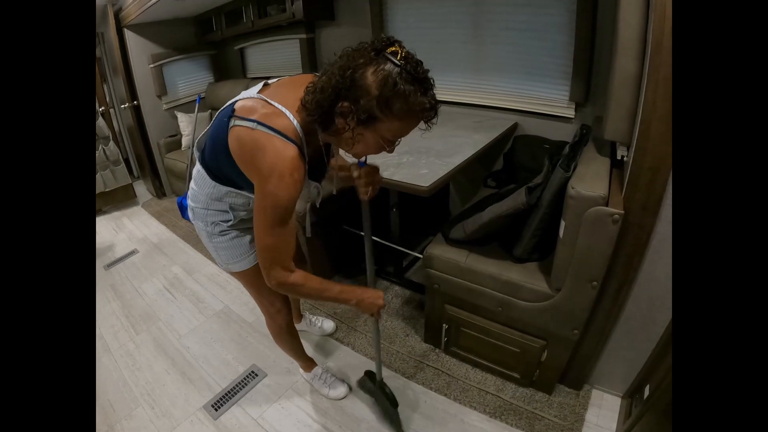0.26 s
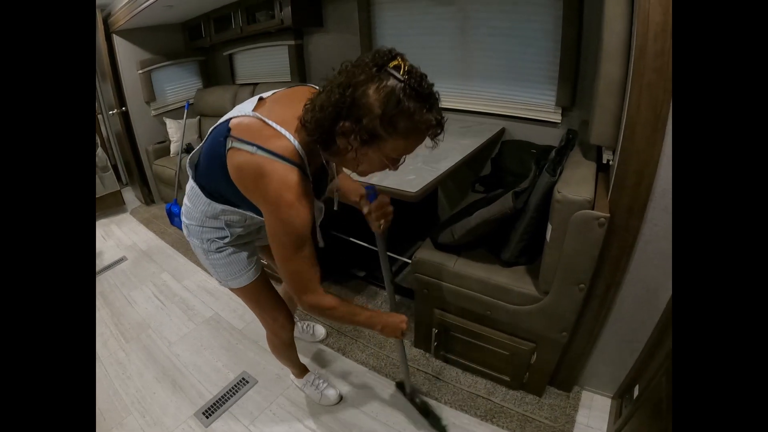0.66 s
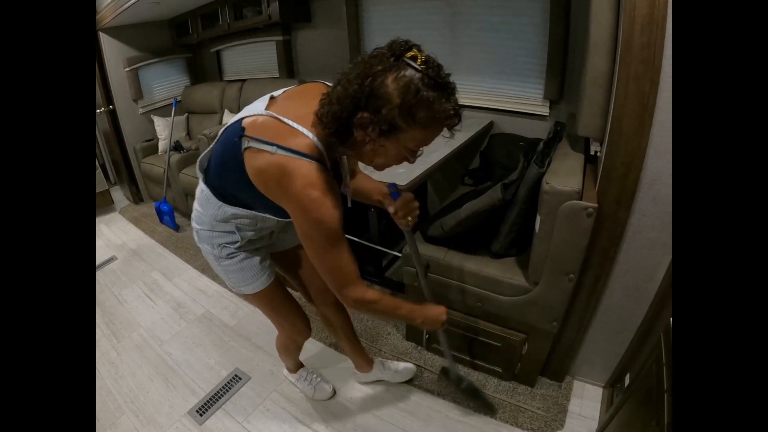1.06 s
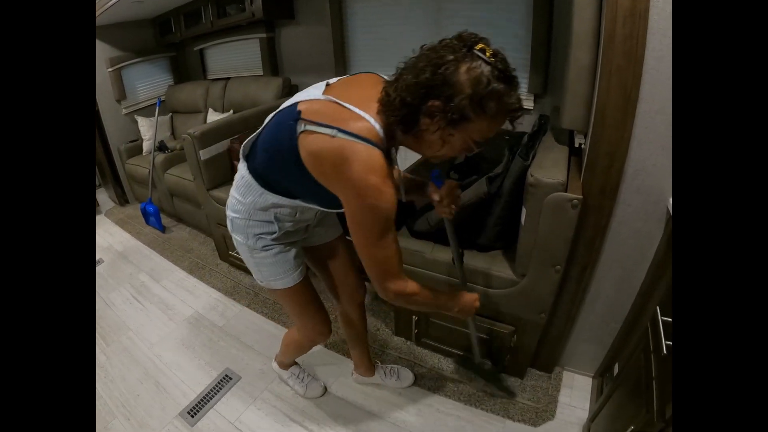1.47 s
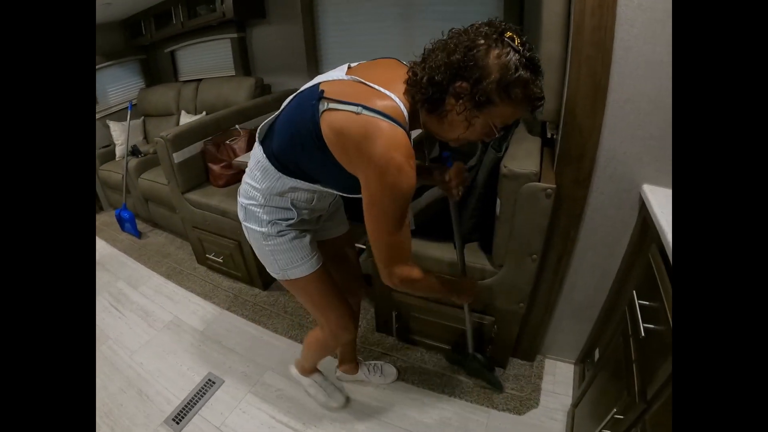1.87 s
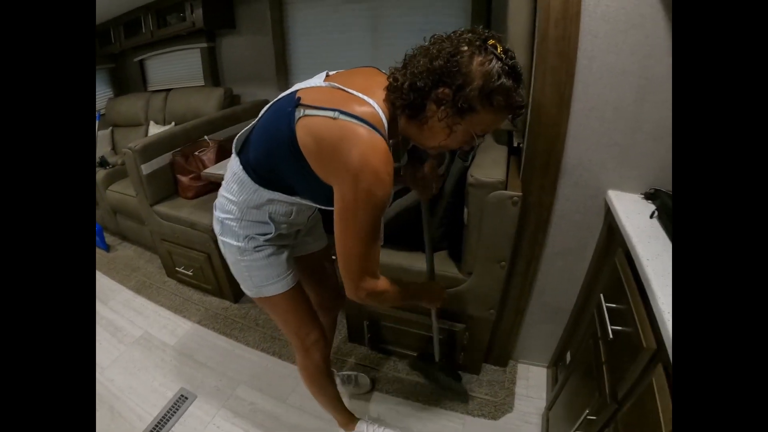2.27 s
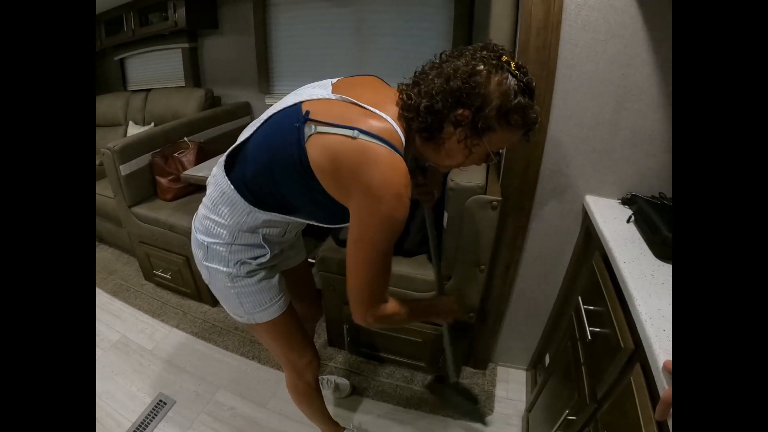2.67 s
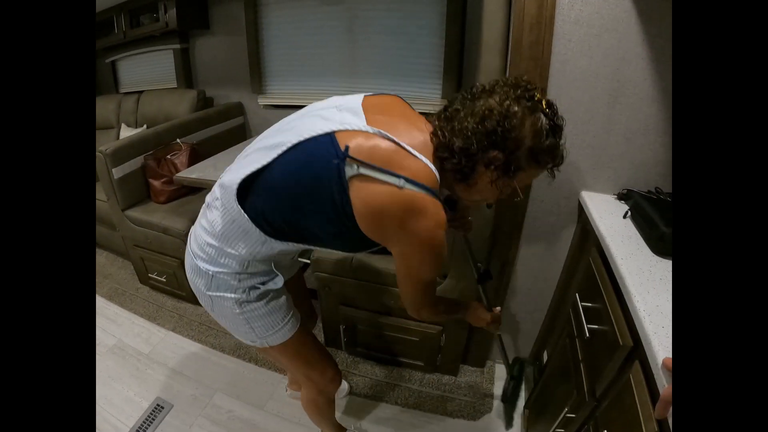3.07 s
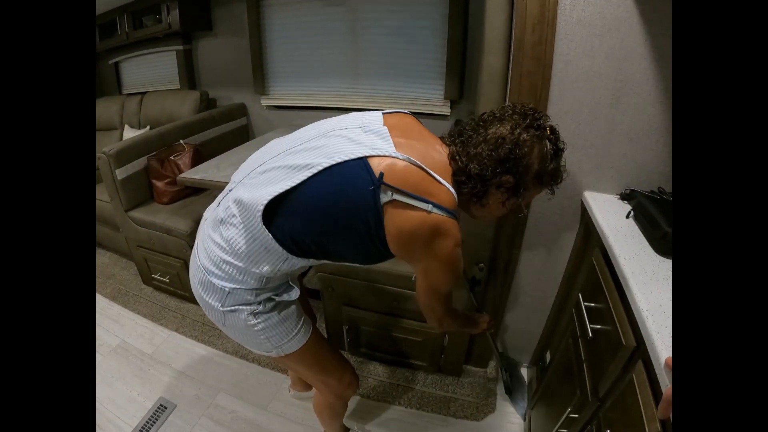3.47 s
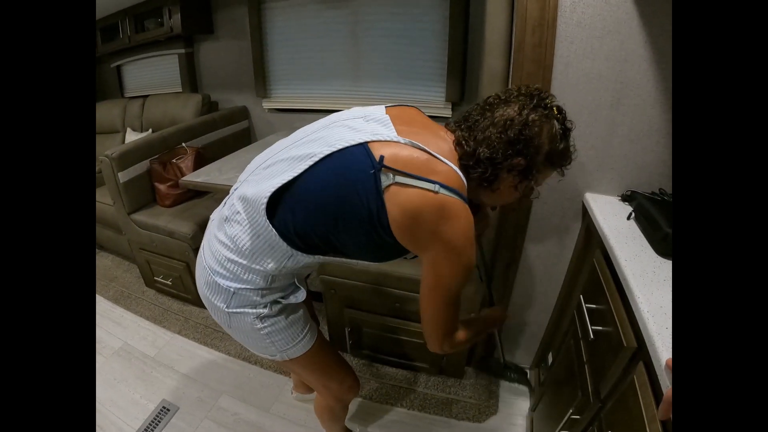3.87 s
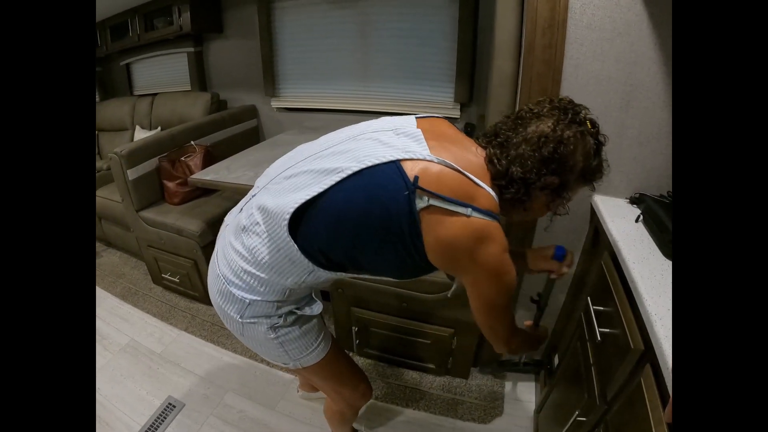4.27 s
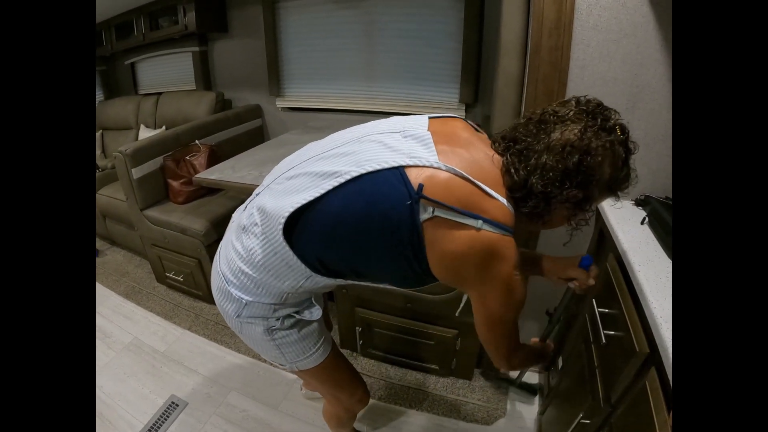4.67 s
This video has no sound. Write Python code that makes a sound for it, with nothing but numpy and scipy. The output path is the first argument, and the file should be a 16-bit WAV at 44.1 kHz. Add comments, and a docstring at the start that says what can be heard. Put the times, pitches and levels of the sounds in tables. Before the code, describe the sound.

A plastic broom sweeps the vinyl floor of a small camper in six even strokes, the bristles scraping and hissing as they flick free. Then it works into a corner with shorter, coarser pokes, its head tapping and knocking on wooden furniture, loudest near the end. Soft footsteps, a short room echo and faint air noise lie underneath, along with a low sway from the body-worn microphone.

```python
"""Someone sweeps the vinyl floor of a small camper with a plastic broom. First come six even strokes:
bent bristles catch and slip on the floor, and their tips hiss and flick free. From about 3 s, short
pokes go into a corner, where tufts rasp over edges and the broom head taps and knocks on wooden
furniture, loudest near the end. All along there are soft footsteps, the short echo of the room,
faint air noise and the slow sway of a camera worn on the body."""
import sys
import numpy as np
from scipy import signal
from scipy.fft import rfft, irfft
from scipy.io import wavfile
from scipy.ndimage import uniform_filter1d

SR = 44100
rng = np.random.default_rng(int(sys.argv[2]) if len(sys.argv) > 2 else 0)


def store_wav(level_fs):
    """Save 16-bit WAV to argv[1]."""
    pcm = np.round(np.clip(np.atleast_2d(level_fs), -1, 1) * 32767)
    wavfile.write(sys.argv[1], SR, pcm.T.astype(np.int16))


N = 213003

# full strokes across the open floor (time the bristles lie flat [s], hold [s], rise [s],
# tip hiss [dB], scrape [dB], delay until the hardest press [s])
FLOOR_STROKES = [(0.195, 0.16, 0.048, -55.5, -52.5, 0.011), (0.712, 0.13, 0.044, -54.5, -53, 0.036),
                 (1.212, 0.11, 0.062, -55, -52, 0.032), (1.637, 0.14, 0.045, -54.5, -53, 0.065),
                 (2.096, 0.11, 0.1, -54.5, -52, 0.028), (2.512, 0.11, 0.047, -56, -54, 0.043)]
# light dabs, drags and pokes (time the bristles lie flat [s], hold [s], rise [s],
# tip hiss [dB], scrape [dB])
SHORT_POKES = [(1.083, 0.034, 0.0032, -55.5, -60), (1.923, 0.19, 0.1, -68.5, -69),
               (2.943, .008, .02, -66, -72.5), (3.012, 0.013, .04, -65, -68),
               (3.139, .075, 0.012, -60, -59), (3.279, 0.13, 0.057, -58, -51),
               (3.423, 0.086, 0.034, -57, -57.5), (3.658, .17, 0.069, -62.5, -64),
               (3.901, 0.014, 0.063, -61.5, -59.5), (4.065, 0.013, .01, -68.5, -78),
               (4.285, 0.047, 0.19, -59.5, -58), (4.429, 0.046, 0.14, -61, -54.5),
               (4.522, 0.028, 0.016, -54.5, -44), (4.583, 0.049, 0.057, -50, -48.5)]
# tone of the light bristle tips (frequency [Hz], level [dB])
TIP_TONE = [(200, -24), (700, -18), (1500, -17), (3000, -1.5), (4500, -2), (7500, -1.5), (9500, -3.5),
            (11000, -8), (13500, -7.5), (15800, -16.5)]
# tone of bristles pressed on the open floor (frequency [Hz], level [dB])
FLOOR_TONE = [(60, -27), (150, 8.5), (220, -3.5), (290, 4.5), (410, -9), (540, 1), (850, -1.5),
              (1050, -1.5), (1300, -3.5), (1700, -4.5), (2400, -5), (3600, -12.5), (7000, -17.5),
              (15000, -17.5)]
# tone of bristles dragged along the furniture (frequency [Hz], level [dB])
CORNER_TONE = [(100, 3.5), (220, 3), (330, 0), (480, 3), (650, 5.5), (820, 6), (1020, 4), (1300, 6.5),
               (2000, 5.5), (2600, 5), (3800, -2.5), (5800, -6.5), (9000, -16), (15000, -38)]
# sharp taps of the plastic head and snapping bristles (time [s], level [dB], pitch [Hz], fade [s])
PLASTIC_TAPS = [(1.084, -55.5, 4000, 0.0054), (1.506, -64.5, 3020, 0.0042), (1.92, -51, 5540, 0.0035),
                (2.037, -55, 3000, 0.0058), (3.132, -62, 3000, .01), (3.281, -53, 2200, .004),
                (3.371, -48, 1500, .003), (3.410, -48, 3000, .004), (3.5737, -47.5, 5500, .0012),
                (3.738, -56, 2900, 0.0056), (4.457, -48, 3200, 0.0028), (4.519, -38, 3130, 0.001),
                (4.529, -36, 2890, .0016), (4.537, -38, 2270, 0.0017), (4.567, -44, 3300, .002),
                (4.58, -46, 3500, 0.0017), (4.617, -45.5, 2100, 0.0087)]
# a tuft rasps over an edge (time [s], level [dB], pitch [Hz], brightness [dB], rise [s], fade [s])
TUFT_RASPS = [(0.577, -71.5, 3130, 1, 0.0088, 0.04), (1.918, -67, 3120, -6, 0.0057, .05),
              (3.44, -57.5, 2940, -20, 0.01, 0.026), (3.495, -50, 3110, 3.5, 0.016, 0.009),
              (3.893, -62, 1790, -8, 0.016, 0.018), (4.101, -63.5, 3040, -4, 0.007, 0.071)]
# a tuft's upper tones (frequency [times its pitch], width [share of that frequency], level [dB])
TUFT_OVERTONES = [(1.83, 0.068, 21), (3.3, 0.34, 10), (4.05, 0.06, 1), (4.6, 0.042, 10)]
# broom head and shoes hit furniture and floor (time [s], level [dB], low edge [Hz], high edge [Hz])
WOOD_KNOCKS = [(1.112, -65, 48, 96), (1.507, -79.5, 700, 1410), (2.035, -65.5, 328, 785),
               (2.048, -65, 370, 482), (2.42, -73.5, 218, 516), (2.616, -70, 75, 230),
               (3.28, -70.5, 302, 365), (3.288, -66, 2200, 2940), (3.367, -69, 292, 366),
               (3.737, -56, 65.6, 484), (4.315, -76.5, 244, 332), (4.615, -49, 135, 1510)]
# the notes the wooden panels and, higher up, the plastic broom head ring at (frequency [Hz], level [dB], time
# to fade by 60 dB [s])
PANEL_NOTES = [(94, -1, .2), (150, -1, .22), (205, -8, .2), (262, 2, .17), (404, -2, .2), (555, 1, .14),
               (590, -5, .15), (745, -6, .15), (790, -3, .14), (865, -4, .14), (1300, 0, .11),
               (1500, -7, .12), (1631, -1, .09), (1940, -10, .12), (2396, -10, .12), (2590, -8, .12)]
# tone of the still air (frequency [Hz], level [dB])
AIR_TONE = [(94, -42.5), (160, -4.5), (371, -6), (485, -10), (830, -11.5), (1060, -14), (1360, -13.5),
            (15500, -22.5)]
# how much the person wearing the camera moves (time [s], level [dB])
BODY_MOTION = [(0, 5), (.6, -3.5), (1.4, 3.5), (1.9, 0.5), (2.6, 3), (3.3, 5), (3.6, -4.5), (4.3, -4),
               (4.8, -10.5)]


def bristles(corner_from_s=3.0):
    """Slipping bristles: the tips hiss, and the pressed ones scrape, more coarsely in the corner."""
    t = np.arange(N) / SR
    tips_gain, scrape_gain = broom_pressure(t)
    tips = unit(colour(slips(per_s=14000, spread_db=0.5, bunch_db=-0.4), TIP_TONE))
    open_floor = unit(colour(slips(per_s=7000, spread_db=1.5, bunch_db=-0.07), FLOOR_TONE))
    corner = unit(colour(slips(per_s=4000, spread_db=-0.5, bunch_db=2.5), CORNER_TONE))
    scrape = np.where(t < corner_from_s, undb(0.4) * open_floor, undb(-4.0) * corner)
    return undb(-3.5) * tips * tips_gain + scrape * scrape_gain


def slips(per_s, spread_db, bunch_db):
    """Each bristle sticks, then slips with a tiny click; sizes vary, and neighbours let go in bunches."""
    clicks = (rng.random(N) < per_s / SR) * rng.standard_normal(N)
    size_db = spread_db * np.minimum(rng.exponential(size=N), 4)
    return clicks * undb(size_db + bunch_db * wander(per_s=140))


def broom_pressure(t, flick_db=3, flick_s=0.022, ease_db_per_s=104):
    """Strength of hiss and scrape: a stroke presses, eases off and flicks; a poke touches and lifts."""
    tips, scrape = [], []
    for start, hold, rise, tips_db, scrape_db, press_delay in FLOOR_STROKES:
        age = t - start
        flick = flick_db * np.exp(-((age - hold) / flick_s) ** 2)  # tips spring free as the broom lifts
        ease = ease_db_per_s * np.abs(age - press_delay)  # weaker before and after the hardest press
        tips.append(tips_db + flick + contact_db(age, hold, rise, fall_db_per_s=324))
        scrape.append(scrape_db - ease + contact_db(age, hold, rise, fall_db_per_s=402))
    for start, hold, rise, tips_db, scrape_db in SHORT_POKES:
        touch = contact_db(t - start, hold, rise, fall_db_per_s=216)
        tips.append(tips_db + touch)
        scrape.append(scrape_db + touch)
    return undb(np.max(tips, axis=0)), undb(np.max(scrape, axis=0))


def contact_db(age, hold, rise, fall_db_per_s, rise_db=17):
    """One touch of the broom grows, holds and dies away; age is 0 where the hold begins."""
    return rise_db * np.minimum(age, 0) / rise - fall_db_per_s * np.maximum(age - hold, 0)


def taps(ring_db=-17):
    """Hard plastic hits with a brief crack that also makes the broom head ring faintly."""
    out, t = np.zeros(N), np.arange(SR // 4) / SR
    for start, db, hz, fade in PLASTIC_TAPS:
        crack = unit(band(rng.standard_normal(len(t)), hz / 2, hz * 2)) * np.exp(-t / fade)
        ring = band(panel_ring(t), hz / 2, hz * 2)
        add(out, start, undb(db) * (crack + undb(ring_db) * ring))
    return out


def rasps(ring_width=0.055, hiss_db=1):
    """A fast run of slips rings a stiff plastic tuft; a hard flick adds upper tones and hiss."""
    out, t = np.zeros(N), np.arange(SR // 3) / SR
    for start, db, hz, bright_db, rise, fade in TUFT_RASPS:
        rubbing = rng.standard_normal(len(t))
        ring = unit(resonate(rubbing, hz, ring_width))
        upper = unit(sum(undb(tone_db) * resonate(rubbing, hz * multiple, width)
                         for multiple, width, tone_db in TUFT_OVERTONES))
        hiss = undb(hiss_db) * unit(band(rubbing, 2600, 11800))
        force = np.minimum(t / rise, 1) * np.exp(-np.maximum(t - rise, 0) / fade)
        add(out, start, undb(db) * force * (ring + undb(bright_db) * unit(upper + hiss)))
    return out


def knocks(rattle_db=1.5):
    """Broom head and shoes make wood ring and rattle, each blow in its own range, from low to high."""
    out, t = np.zeros(N), np.arange(SR // 2) / SR
    for start, db, low_hz, high_hz in WOOD_KNOCKS:
        ring = unit(band(panel_ring(t), low_hz, high_hz, order=3))
        chatter = unit(band(rattle(t), low_hz, high_hz, order=3))
        add(out, start, undb(db) * unit(ring + undb(rattle_db) * chatter))
    return out


def panel_ring(t):
    """Wooden panels and the broom head ring after a blow; each spot that is hit gives a slightly different mix
    of notes."""
    out = 0
    for hz, db, ring_s in PANEL_NOTES:
        strength = undb(db + rng.normal(0, 1)) * rng.choice([-1, 1])
        out = out + strength * np.sin(2 * np.pi * hz * t) * np.exp(-np.log(1000) * t / ring_s)
    return out


def rattle(t, middle_hz=350, middle_fade_s=0.02, delay_cycles=0.84, tilt_db_per_octave=2):
    """Loose wood chatters, one noise burst per octave: the low ones come later and last longer."""
    out = 0
    for hz in 62.5 * 2 ** np.arange(6):
        age = t - delay_cycles / hz
        fade = middle_fade_s * (middle_hz / hz) ** 0.75
        burst = rng.standard_normal(len(t)) * (age >= 0) * np.exp(-np.abs(age) / fade)
        gain = undb(tilt_db_per_octave * np.log2(hz / middle_hz))
        out = out + gain * unit(band(burst, hz / np.sqrt(2), hz * np.sqrt(2)))
    return out


def room(x, echo_db, echo_s=0.31, pieces=60):
    """Close walls and cushions add a short echo that keeps changing as broom and camera move."""
    out, t = x.copy(), np.arange(SR // 3) / SR
    hop = N // pieces
    for i in range(0, N - hop, hop):  # each overlapping piece gets an echo of its own
        piece = x[i:i + 2 * hop]
        piece = piece * np.sin(np.pi * np.arange(len(piece)) / (2 * hop))
        tail = band(rng.standard_normal(len(t)), 110, 18400, order=1)
        tail *= np.exp(-np.log(1000) * t / echo_s)  # 60 dB down after echo_s
        tail /= np.sqrt(np.sum(tail ** 2))
        add(out, i / SR, undb(echo_db) * signal.fftconvolve(piece, tail))
    return out


def background():
    """Air hisses, the moving camera sways and rumbles, and the hollow floor booms as weight shifts."""
    air = undb(-68.5) * unit(colour(rng.standard_normal(N), AIR_TONE))
    sway = undb(-38) * unit(band(rng.standard_normal(N), 5.675, 9.95, order=3))
    rumble = undb(-56) * unit(band(rng.standard_normal(N), 7.0, 31.1, order=3))
    boom = undb(-67) * unit(band(rng.standard_normal(N), 38.0, 96.0, order=3))
    motion = undb(np.interp(np.arange(N) / SR, *np.transpose(BODY_MOTION)))
    return air + (sway + rumble + boom) * motion


def undb(db):
    """Turn decibels into a number to multiply by."""
    return 10 ** (np.asarray(db) / 20)


def unit(x):
    """Scale a sound to an average strength (rms) of 1."""
    return x / np.sqrt(np.mean(x ** 2) + 1e-20)


def colour(x, points):
    """Shape a sound's tone along a curve of (frequency [Hz], level [dB]) points."""
    hz, db = np.transpose(points)
    grid_hz = np.maximum(np.fft.rfftfreq(4096, 1 / SR), 1)
    gains = undb(np.interp(np.log(grid_hz), np.log(hz), db))
    cepstrum = irfft(np.log(gains))
    half = len(cepstrum) // 2
    cepstrum[1:half] *= 2  # folded this way, the filter rings only after a click, never before
    cepstrum[half + 1:] = 0
    click_response = irfft(np.exp(rfft(cepstrum)))
    return signal.fftconvolve(x, click_response)[:len(x)]


def band(x, low_hz, high_hz, order=2):
    """Keep the part of a sound between two frequencies."""
    high_hz = min(max(high_hz, low_hz * 1.01), SR * 0.47)
    return signal.sosfilt(signal.butter(order, [low_hz, high_hz], "band", fs=SR, output="sos"), x)


def resonate(x, hz, width):
    """Keep a narrow band around one pitch; width is a share of that pitch."""
    return band(x, hz * (1 - width / 2), hz * (1 + width / 2), order=1)


def add(out, start_s, sound):
    """Mix a sound in at a given time."""
    i = int(start_s * SR)
    out[i:i + len(sound)] += sound[:N - i]


def wander(per_s):
    """A value that glides to a new random spot per_s times a second."""
    step = int(SR / per_s)
    stairs = np.repeat(rng.standard_normal(N // step + 1), step)
    return unit(uniform_filter1d(stairs, step))[:N]


def scene():
    """Sweeping and knocks in the small room, over the background, in one channel."""
    sweeping = room(bristles() + taps() + rasps(), echo_db=-10)
    knocking = room(knocks(), echo_db=-14.5)
    return (sweeping + knocking + background())[None]


def record(dry, top_hz=15850):
    """The camera cuts off the highest treble."""
    return signal.sosfilt(signal.ellip(10, 0.2, 70, top_hz, fs=SR, output="sos"), dry)


dry = scene()
out = record(dry)
store_wav(out)
```